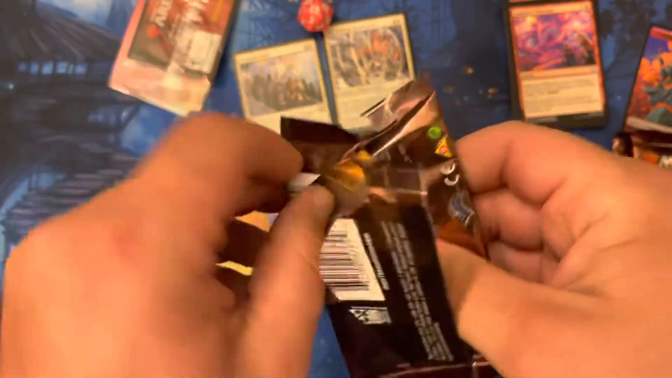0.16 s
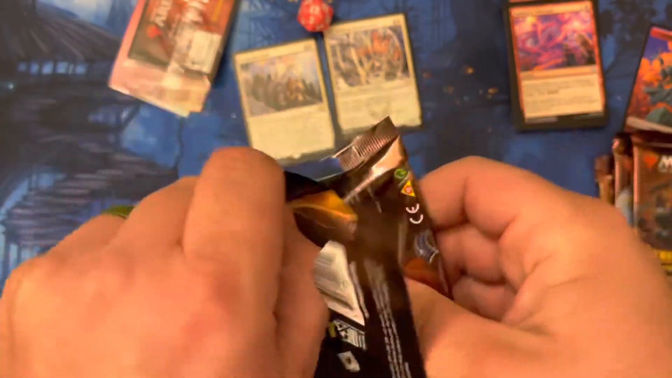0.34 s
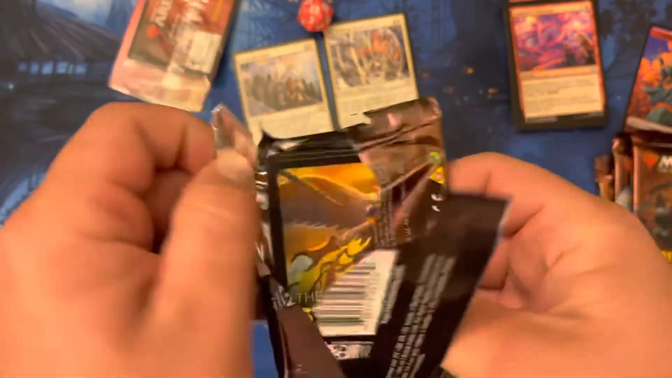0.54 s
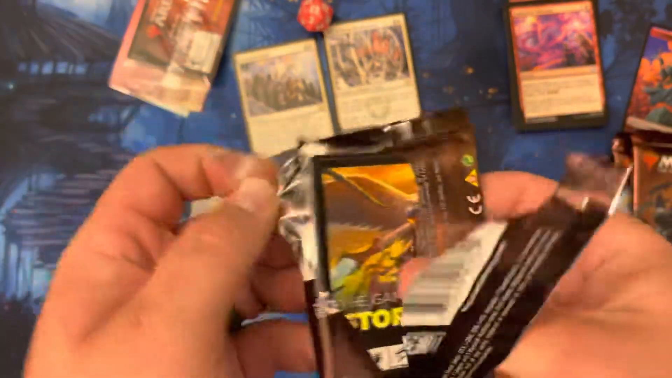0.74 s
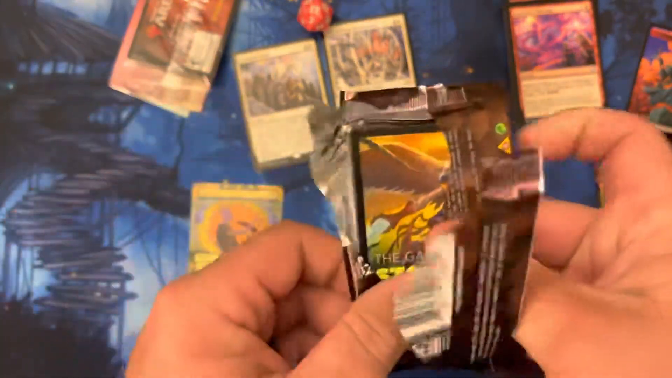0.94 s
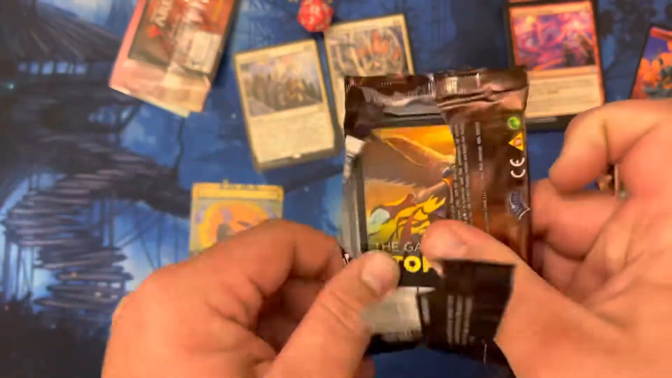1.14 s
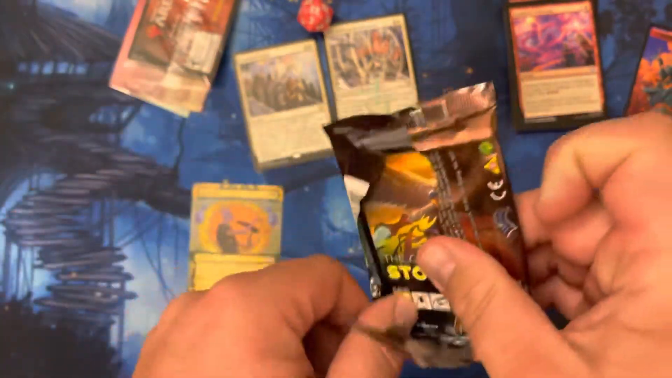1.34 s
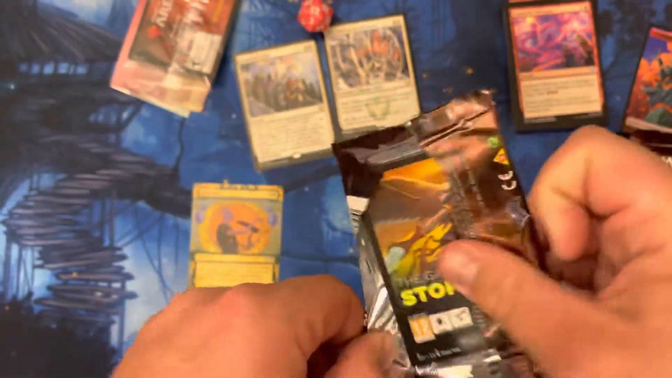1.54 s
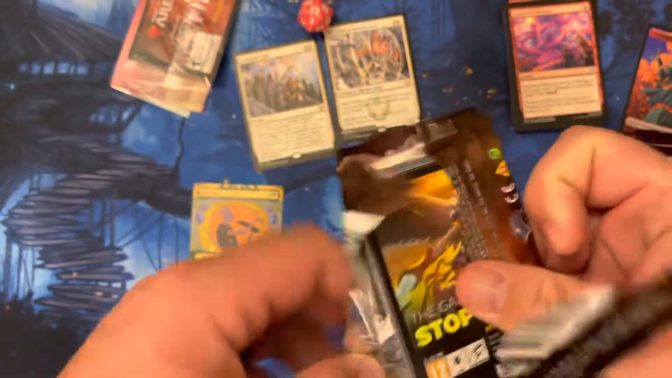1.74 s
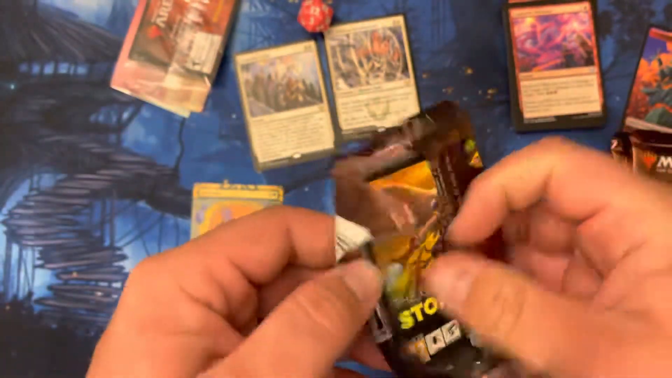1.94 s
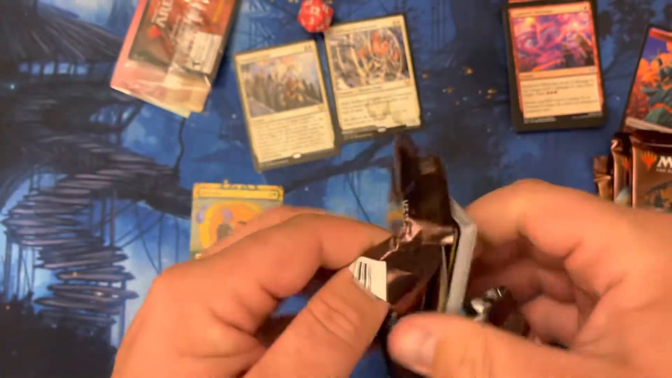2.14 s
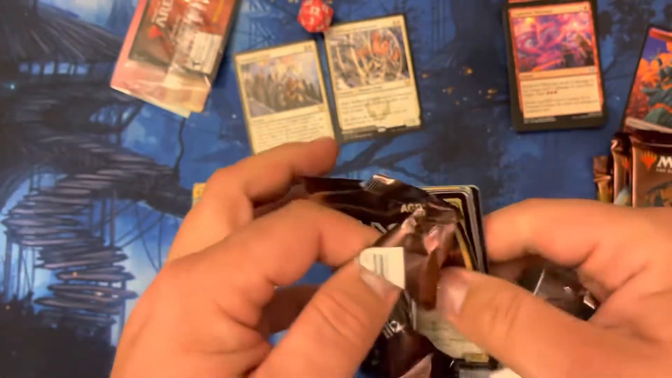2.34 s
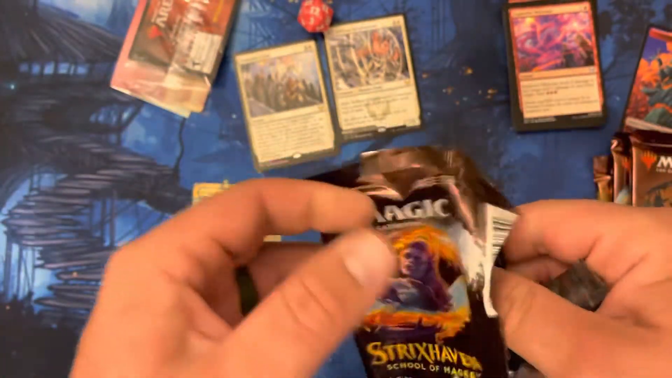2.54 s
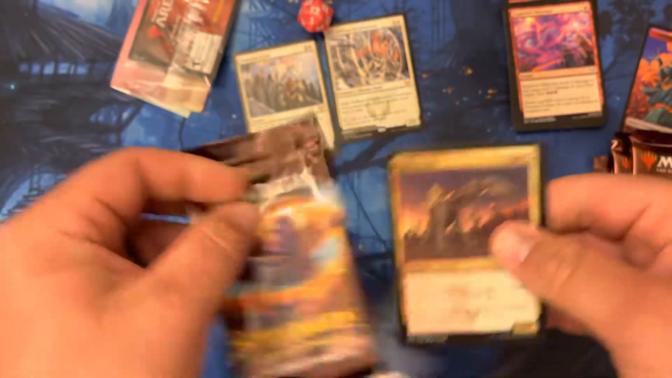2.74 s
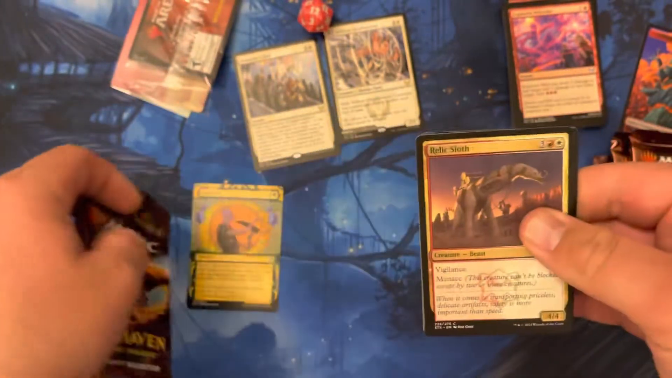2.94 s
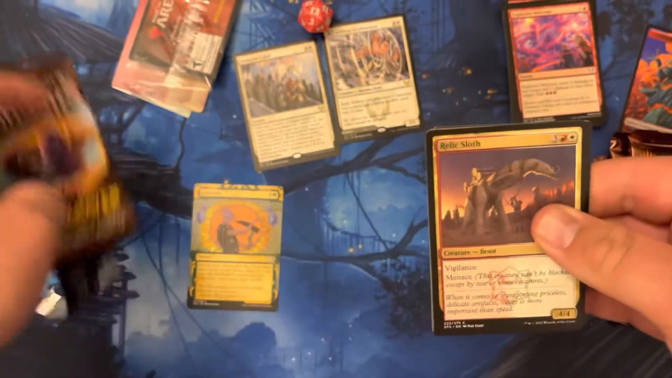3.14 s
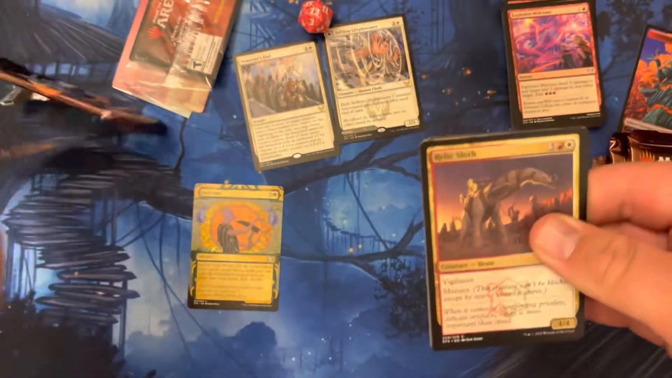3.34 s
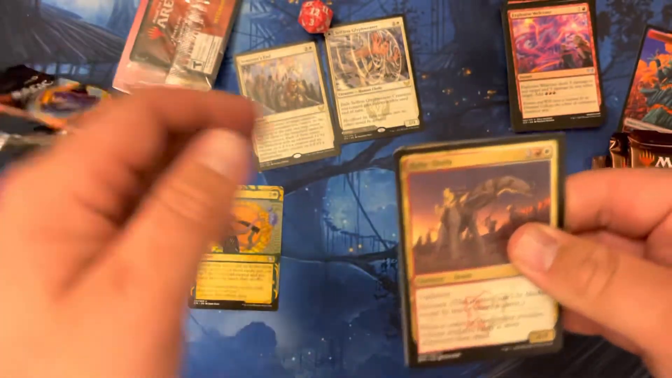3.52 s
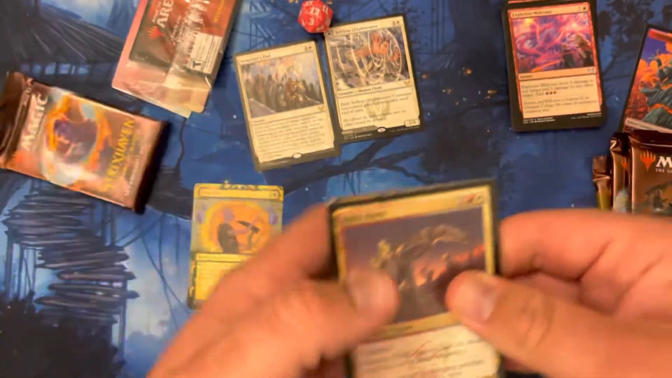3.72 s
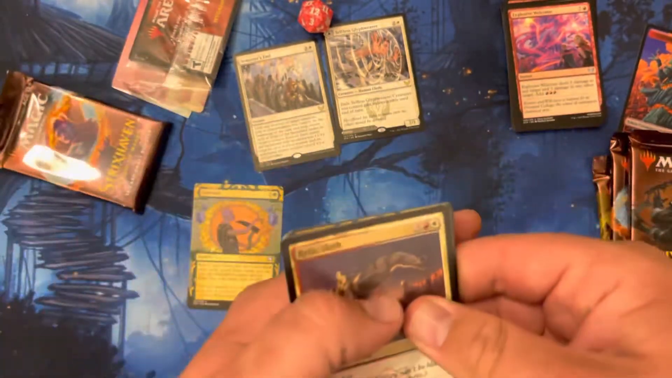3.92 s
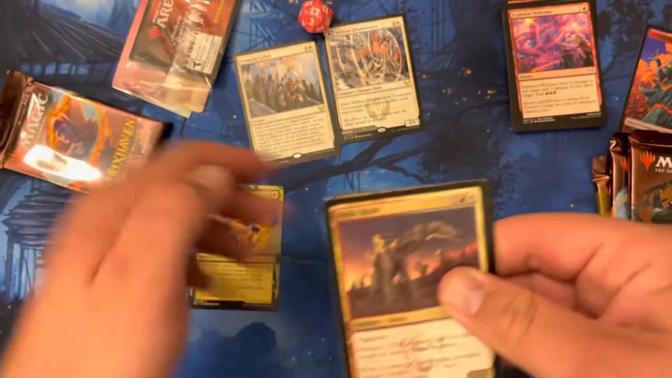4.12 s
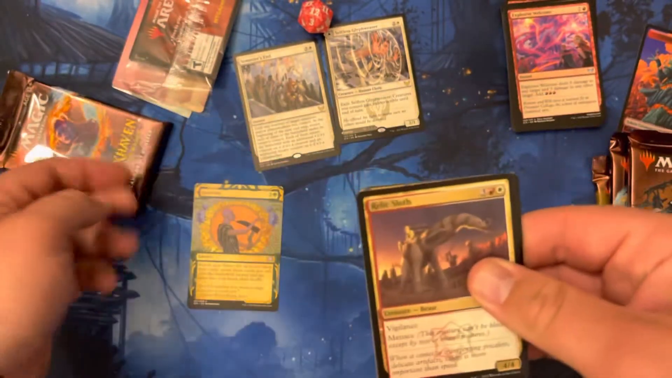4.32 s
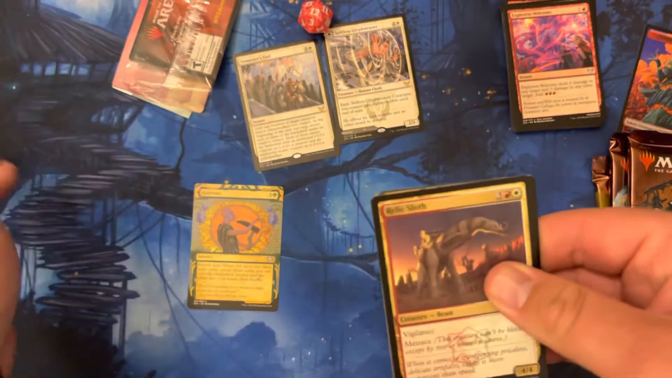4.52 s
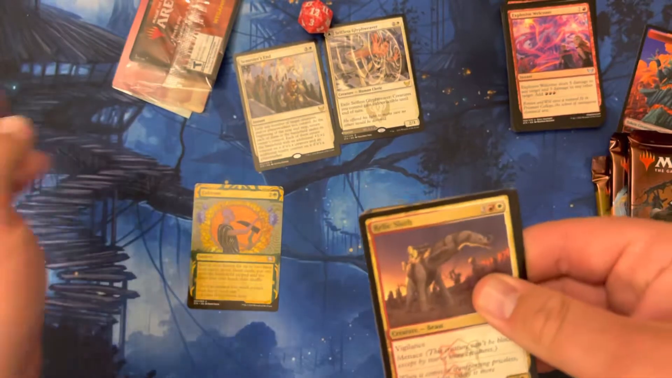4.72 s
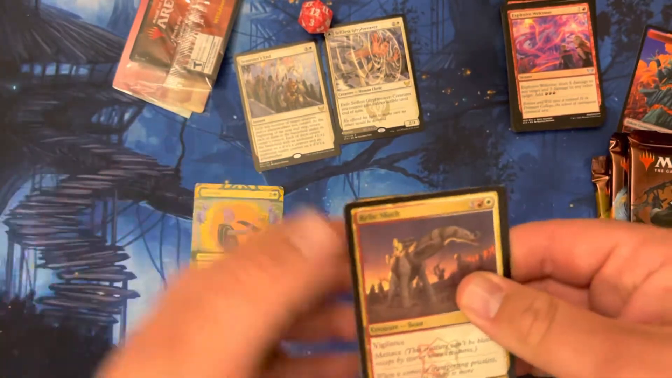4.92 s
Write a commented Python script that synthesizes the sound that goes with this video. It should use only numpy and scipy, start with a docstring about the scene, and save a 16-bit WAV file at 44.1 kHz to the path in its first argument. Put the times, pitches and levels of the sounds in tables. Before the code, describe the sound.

A foil card pack crackles and rips sharply in close fingers for nearly three seconds, then near silence with a brief wrapper scrape.

```python
"""On a mat in a quiet room, close under a phone, fingers crumple and tear a foil card pack; later the wrapper scrapes.
Buckling creases snap as noise bursts a few ms long; panels low and high pop as short damped sines.
Gated noise grains make rustle, rips, scrape and the soft rub of cards; jittered pulses make a creak.
Soft blows are short falling chirps with a shake of the table; hand rumble and faint air noise lie beneath.
Two microphone ports hear it with unequal phase and level, and with short reflections."""
import sys
import numpy as np
from scipy import signal
from scipy.fft import rfft, irfft
from scipy.io import wavfile
from scipy.ndimage import uniform_filter1d, map_coordinates

SR = 44100
rng = np.random.default_rng(int(sys.argv[2]) if len(sys.argv) > 2 else 0)


def int16_out(signal):
    """Quantize to a 16-bit WAV file."""
    q = np.round(np.clip(np.atleast_2d(signal).T, -1, 1) * 32767)
    wavfile.write(sys.argv[1], SR, q.astype(np.int16))


N = 223713

# Creases buckling: t/s, panel reference level/dB, panel f/Hz, pack body re panel/dB, treble re panel/dB
CREASE_SNAPS = [(0.0433, -22.5, 2570, -45, -20), (0.063, -16, 3820, -21.5, -17),
                (0.0952, -15.5, 2120, -20, -5), (0.104, -30, 2000, -21, -29),
                (0.1522, -24, 2090, -11.5, -14), (0.183, -39, 3000, -31, -6),
                (0.2027, -32, 2480, -46, -7.5), (0.2821, -20.5, 2520, -28.5, -37),
                (0.2986, -32.5, 3683, -22, 2), (0.316, -37, 2200, -16.5, -5.5),
                (0.3738, -30, 2170, -39, -40), (0.392, -29, 3170, -13.5, -14.5),
                (0.4058, -7, 2850, -26, -5.5), (0.4388, -6, 2890, -19, -1.5),
                (0.4417, -11, 2200, -9.5, -8.5), (0.45, -21, 5660, -12, 5.5),
                (0.4607, -9.5, 3220, -16.5, -16.5), (0.4705, -18.5, 6280, -22.5, 2),
                (0.4912, -20, 3135, -36.5, -9), (0.5046, -25, 6296, -18, -1.5),
                (0.5679, -16, 2150, -8.5, -2.5), (0.596, -18, 6300, -37, -1.5),
                (0.6354, -22.5, 2610, -18, -8), (0.6817, -15.5, 3370, -23, -8.5),
                (0.6871, -33.5, 2090, 8, -21), (0.6984, -22, 2080, -22, -25),
                (0.7198, -25.5, 5530, -39, -0.5), (0.7318, -12.5, 2900, -33, -9),
                (0.7419, -12.5, 6400, -20.5, -21), (0.8519, -19, 2830, -36, -16.5),
                (0.9152, -14.5, 4010, -40, -6.5), (0.9405, -23, 3920, -14, -14.5),
                (0.9495, -28, 2130, -29, -18.5), (0.968, -18.5, 2160, -6.5, -25.5),
                (0.9902, -12.5, 5840, -10.5, -5), (1.0423, -15, 2420, -8.5, -2),
                (1.0804, -17.5, 1750, -19.5, -32), (1.123, -25, 2688, -18, -15),
                (1.1319, -10.5, 3420, -49, -14), (1.2457, -16.5, 3580, -34, -21),
                (1.2516, -25, 2160, -19, -9), (1.2608, -19, 1740, -16, -17), (1.266, -24, 2800, -40, -11),
                (1.2744, -27.5, 3000, -28, -7.5), (1.279, -13, 2860, -17, 2),
                (1.3091, -16, 5776, -13.5, 0.5), (1.325, -29, 3000, -22, -2),
                (1.3303, -21.5, 2210, -13.5, -30), (1.3649, -23, 2400, -15.5, -10),
                (1.3831, -13, 6300, -37.5, -11), (1.4473, -16, 2597, -13, -3),
                (1.4494, -18.5, 3210, -16.5, -0.5), (1.4541, -9.5, 2970, -24, -1),
                (1.4648, -7.5, 1740, -20.5, -30), (1.491, -9, 2410, -16.5, -11),
                (1.505, -16, 2920, -5, -6.5), (1.5086, -7.5, 1800, -22, -6),
                (1.5185, -14.5, 2600, -21, -7.5), (1.5389, -11.5, 2880, -14.5, -10.5),
                (1.545, -18, 1704, -16, -3.5), (1.5551, -16, 2460, -23, 0),
                (1.5665, -27.5, 1800, -11.5, -13), (1.582, -20.5, 2540, -21.5, -7),
                (1.6112, -43, 5800, -17.5, -8.5), (1.6292, -11, 3200, -13.5, -2.5),
                (1.6352, -10.5, 2480, -24.5, -9), (1.6457, -17, 2416, -16.5, -4),
                (1.662, -25, 1700, -6.5, -15.5), (1.667, -18, 2520, -23.5, -28),
                (1.6991, -17, 3025, -18.5, -14), (1.7117, -20.5, 2138, -8.5, -8.5),
                (1.7309, -17.5, 2820, -5, -5.5), (1.7393, -17.5, 5810, -14.5, 1),
                (1.7524, -12.5, 5980, -15, 3.5), (1.7778, -13.5, 2440, -7.5, -4.5),
                (1.7973, -27, 2830, -37, 3.5), (1.8208, -22.5, 2140, -16, -34),
                (1.844, -19.5, 6040, -30.5, -3.5), (1.9028, -10, 6440, -31, -14),
                (1.9138, -20.5, 4140, -11.5, -2), (1.9264, -12, 1739, -16, 3),
                (1.942, -18, 2717, -7.5, -10), (1.9663, -14, 5857, -20, 1), (1.9957, -20, 3640, -17, -2),
                (2.006, -27, 2565, -5, -14), (2.013, -13, 6160, -23.5, -0.5),
                (2.0335, -7.5, 3700, -35, -13.5), (2.0683, -9, 2930, -17, -1), (2.089, -29, 3000, -9, -6.5),
                (2.1066, -32, 2200, -19.5, -9), (2.1192, -18, 5800, -22.5, -0.5),
                (2.168, -18, 1730, -24, -8), (2.1822, -6.5, 3920, -44, -8.5),
                (2.1947, -25, 2938, -16.5, -5), (2.2094, -9, 2680, -16, -1),
                (2.215, -11, 2790, -26.5, -22.5), (2.2528, -26, 5820, -23, -1.5),
                (2.2851, -23, 5966, -20, 2.5), (2.3088, -15.5, 3400, -34, -12.5),
                (2.32, -27, 5760, -12, -3.5), (2.3546, -36, 3320, -16.5, 8.5),
                (2.3835, -5.5, 2490, -25.5, -9.5), (2.3851, -2, 3900, -20, -5),
                (2.4208, -7, 3310, -18, -21), (2.4215, -13.5, 3500, -13, -6),
                (2.4482, -17.5, 3500, -20, -3.5), (2.4673, -6.5, 3750, -28, -8.5),
                (2.5279, -15.5, 5940, -44, 3.5), (2.5408, -20, 6040, -29.5, -13),
                (2.6089, -14.5, 1700, -10, -17.5), (2.6187, -18.5, 2438, -22, -14.5),
                (2.6465, -3.5, 3034, -24.5, -20), (2.6577, -16, 3550, -19, -15),
                (2.6773, -4, 5900, -31.5, -13.5), (2.7202, -24.5, 2500, -12.5, -10),
                (2.7467, -21, 1750, -11.5, -6.5), (2.769, -26, 2830, -32.5, -16),
                (2.802, -33, 2500, -27, -9), (2.8543, -15, 5340, -23.5, -3.5), (2.8898, -23, 5540, -17, -6),
                (2.9425, -32, 3980, -17, -4), (3.012, -49, 2200, -4, -16), (3.036, -37, 5800, -27, -21.5),
                (3.058, -22.5, 6260, -36, -23), (3.0674, -24.5, 1820, -17, -16),
                (3.083, -29, 1700, -15, -16), (3.1172, -33.5, 5880, -12, -11), (3.141, -46, 2500, -22, -30),
                (3.1588, -24, 5850, -20, -0.5), (3.2683, -29.5, 2450, -15.5, -15.5),
                (3.2951, -45, 2660, 1, -37), (3.319, -48, 6480, -13, -4), (3.3653, -46.5, 1930, -6, -9),
                (3.3831, -45.5, 2100, -10, -29), (3.4103, -51.5, 6410, -16.5, 1),
                (3.6357, -32.5, 2150, -11.5, -37.5), (3.8218, -44.5, 4000, -32, -9.5),
                (4.344, -21.5, 5600, -38, -3), (4.4203, -23, 5710, -48, 3.5), (4.439, -30, 6300, -36, -3),
                (4.474, -43, 2500, -27, -12), (4.5818, -40, 4220, -26, -17), (4.7217, -37, 3600, -32, -25),
                (4.73, -31.5, 5790, -22.5, -22)]
# Bands of a snap, low to high: lower f/Hz, upper f/Hz, level/dB
CREASE_BANDS = [(145, 380, -18.5), (420, 1840, 7.5), (1410, 3900, -14.5), (4430, 7360, -1.5),
                (7720, 8250, -3.5), (9640, 12565, 10.5), (12500, 14000, 0)]
# Modes of the stack of cards in its sleeve: f/Hz, width/Hz, level/dB
PACK_MODES = [(490, 310, -7.5), (674, 33, -4), (940, 100, -9), (1380, 250, 1.5), (1680, 170, -0.5),
              (2120, 42, 6.5)]
# Panels popping, low and high: t/s, level/dB, f/Hz
PANEL_POPS = [(1.039, -34, 1300), (1.0795, -36, 520), (1.6343, -16, 870), (1.6371, -18, 443),
              (1.663, -35, 597), (1.677, -32, 820), (2.115, -20, 2880), (2.853, -36, 600),
              (2.891, -33.5, 684), (3.267, -36, 2450), (3.297, -31, 2440), (3.6374, -31, 3670),
              (4.349, -35, 570), (4.724, -34.5, 4390)]
# Radiation of the foil sheet: f/Hz, relative spectral level/dB
FOIL_SPECTRUM = [(300, -9.5), (1000, -7.5), (2500, -3), (5000, -1), (8000, -3.5), (10500, -1.5),
                 (12500, -1), (13800, -17), (16000, -24)]
# Rips and swishes: start t/s, length/s, mid-rip level/dB, fall over the rip/dB, pack body re level/dB
RIP_EVENTS = [(0.4345, 0.054, -26, 14, -27), (0.732, 0.0037, -24, -1, -6.5), (0.925, 0.034, -45.5, 2, 1),
              (1.037, 0.014, -26, 3, 0), (1.054, 0.04, -35, 9, 4.5), (1.211, 0.018, -45.5, 9, 7),
              (1.27, 0.036, -42, 4, 8.5), (1.499, 0.022, -19.5, -0.5, -7.5), (1.549, 0.01, -27.5, 0, -4.5),
              (1.62, 0.012, -30, -9, 5.5), (1.728, 0.033, -41, 9, -4), (1.899, 0.015, -26, 0, -0.5),
              (2.032, 0.022, -31, 8, -6), (2.442, 0.031, -20, -2, -15.5), (2.496, 0.029, -31, 2, -13),
              (2.638, 0.041, -26, 12, -10.5), (2.711, 0.012, -44.5, -6, 12.5),
              (2.78, 0.035, -41.5, -0.5, -4), (3.28, 0.048, -53, 3, -7.5), (3.64, 0.072, -62.5, 28, -8),
              (3.961, 0.081, -56, 3, -54), (4.011, 0.11, -73.5, 10.5, -7), (4.245, 0.077, -69.5, 12, -21.5),
              (4.58, 0.033, -62.5, 17, -8), (4.727, 0.12, -62.5, 22, -8), (5.025, 0.072, -51.5, -23, -70)]
# How firmly the fingers work the foil: t/s, rustle level/dB
RUSTLE_COURSE = [(0.0, -46), (0.39, -53.5), (0.69, -49.5), (0.82, -47), (0.89, -66), (0.93, -47),
                 (1.2, -51.5), (1.31, -65), (1.44, -42), (2.19, -41.5), (2.56, -39), (2.73, -41.5),
                 (2.84, -53), (3.108, -52), (3.191, -60.5), (3.35, -63.5), (3.588, -69.5), (3.72, -70),
                 (3.77, -93.5), (3.85, -83), (3.93, -95), (3.98, -74), (4.19, -79), (4.31, -65),
                 (4.399, -64.5), (5.07, -71.5)]
# Crinkling panels of several sizes: f/Hz, level/dB
CRINKLE_PANELS = [(900, -0.5), (1700, 1), (3000, 4.5), (5500, -7), (9500, -20)]
# Wrapper dragged off the mat: t/s, level/dB, pack body re level/dB, middle band before doubling/dB
SCRAPE_COURSE = [(4.333, -60, -8.5, 0), (4.338, -31.5, -5.5, 6), (4.349, -19, -23, -4.5),
                 (4.354, -27, -5, -5), (4.371, -29, -20.5, -6), (4.399, -20, -28, -19),
                 (4.422, -16, -45, -39), (4.427, -23.5, -40, -11), (4.441, -19, -54, -29),
                 (4.45, -38, -23, -9), (4.56, -66, -25, -20.5)]
# Hands and pack bumping the mat: t/s, level/dB, f/Hz that sets when the chirp peaks
MAT_BLOWS = [(0.408, -40.5, 260), (0.44, -33.5, 242), (0.568, -44, 250), (0.686, -37.5, 260),
             (0.743, -45, 161), (0.835, -45, 250), (1.045, -44, 202), (1.135, -51.5, 171),
             (1.281, -51, 210), (1.631, -35, 230), (1.676, -36.5, 260), (1.778, -35.5, 199),
             (1.807, -43.5, 243), (1.909, -39.5, 110), (2.006, -37.5, 172), (2.068, -51.5, 140),
             (2.208, -32.5, 223), (2.332, -62, 120), (2.383, -46, 150), (2.421, -34.5, 210),
             (2.468, -33.5, 123), (2.536, -52.5, 77), (2.651, -32, 145), (2.712, -36.5, 103),
             (2.757, -50.5, 120), (3.085, -49, 180), (3.268, -43.5, 436), (3.297, -47, 400),
             (3.367, -48.5, 397), (4.246, -55, 359), (4.275, -44.5, 100), (4.343, -30, 420),
             (4.357, -40, 130), (4.423, -47.5, 376), (4.573, -44.5, 403), (4.724, -52, 142.5),
             (4.785, -53.5, 110.8)]
# Fingers sliding over the cards: start t/s, length/s, level/dB, f/Hz
CARD_RUBS = [(3.957, 0.21, -75.5, 2072), (4.234, 0.058, -71.5, 1710), (4.471, 0.16, -64, 4090),
             (4.748, 0.38, -79, 2064)]
# Hands resting and shifting on the mat: t/s, drive level/dB
HAND_WEIGHT = [(0.0, -58), (0.15, -76), (0.35, -64), (0.63, -54), (1.35, -69.5), (1.71, -58), (2.74, -50.5),
               (3.83, -75), (4.29, -82.5), (4.42, -57), (5.07, -81.5)]
# Room rumble and hiss: f/Hz, relative spectral level/dB
AIR_SPECTRUM = [(20, -17.5), (40, 3), (80, 3), (160, -10.5), (250, -5), (400, -24), (600, -22.5),
                (1500, -30.5), (5000, -26), (8000, -22), (11000, -28), (12300, -29.5), (16000, -29.5)]
# Phase between the ports: f/Hz, lead of the left/rad
PORT_LEAD = [(0, 0), (600, -.2), (1030, -.5), (1400, 0), (2200, .1), (4220, .8), (4600, 1.8), (4850, 3.14),
             (5250, 5.0), (5680, 6.1), (6720, 6.9), (7840, 8.4), (8400, 9.2), (9200, 9.5), (11900, 12.2),
             (13500, 12.9), (14800, 15.2), (16200, 15.6)]
# Level between the ports: f/Hz, left minus right/dB
PORT_LEVELS = [(60, .5), (200, 1), (380, 3), (700, 3), (1290, 0), (2380, -.5), (4400, -1), (8120, 0)]
# Microphone response: f/Hz, level/dB
MIC_RESPONSE = [(11000, -1.5), (12000, -12), (13300, -16.5), (15700, -24), (16500, -42)]

# Snaps: the foil creeps, buckles at once, then the crease runs on well below the first peak
CREEP_S, CREEP_DB, FRONT = .0008, -20, 1.07  # FRONT: size of the first buckle against the slips
BUCKLE_T60_S, BUCKLE_CYCLES = .0034, 4  # decay time, plus this many cycles of the band's lower edge
RUN_T60_S, RUN_DB = 0.014, -17
PANEL_SPAN, PANEL_DB = 1.226, -2.5  # the panel rings from f / span to f * span
UPPER_FOLLOWS_TREBLE = 0.3  # dB per dB; the 4.7-8 kHz region lies between panel and treble

POP_CYCLES = 2.325  # sets the length of a pop
MID_DB, MID_FOLLOWS_BODY = 5.5, 0.31  # in a rip 1.4-4 kHz rises with the body, dB per dB
RUSTLE_BODY_DB, GRIP_ENDS_S = -8.5, 3.1  # the wrapper is let go at GRIP_ENDS_S
SCRAPE_RING_HZ, SCRAPE_RING_DB = 3700, -8.5  # level before doubling
CREAK_S, CREAK_LENGTH_S, CREAK_RATE_HZ = 1.044, .04, 223
CREAK_DB, CREAK_JITTER = -30.5, .03  # jitter as a share of the slip period
DELAY_CYCLES, CHIRP_START_S = 1.4, .002  # the chirp of a blow at f Hz peaks cycles / f late
TABLE_HZ, TABLE_T60_S, TABLE_DB = 260, 0.11, -7  # the table top rings on
SHAKE_T60_S, SHAKE_DB, SHAKE_SPLIT_HZ = 0.04, -6, 110  # low blows feed the deep band
WANDER_DB, WANDER_S, WANDER_LOW = 1.5, 8e-6, .25  # level swing, time swing, swinging share of the lows
NEAR_T60_S, NEAR_DB = .008, -16  # hands, cards and mat right by the ports
ROOM_T60_S, ROOM_DB = 0.087, -16
AIR_DB = -69.5
TOP_HZ = 16600


def undb(db):
    """Amplitude ratio of a level: 20 dB per factor of ten."""
    return 10 ** (np.asarray(db) / 20)


def along(table, scale=np.log):
    """Frequency response: interpolate a table at every bin of an N-point spectrum."""
    hz, value = np.transpose(table)
    bins_hz = np.fft.rfftfreq(N, 1 / SR)
    return np.interp(scale(bins_hz + 1), scale(hz + 1), value)


def coloured(x, table):
    """Linear filtering by a magnitude spectrum, normalised to rms 1."""
    y = irfft(rfft(x) * undb(along(table)), N)
    return y / np.sqrt(np.mean(y ** 2))


def band(x, lo_hz, hi_hz, order=2):
    """Band limitation: a band-pass along the last axis."""
    sos = signal.butter(order, [lo_hz, hi_hz], "bandpass", fs=SR, output="sos")
    return signal.sosfilt(sos, x)


def add(out, times, sounds):
    """Superposition: sum short sounds at their onset times."""
    for t, sound in zip(times, sounds):
        i = int(t * SR)
        out[i:i + len(sound)] += sound[:N - i]


def grains(rate, spread_db, t60):
    """Shot noise: random ticks of very uneven but bounded size gate noise with short decays; rms 1."""
    size_db = np.minimum(spread_db * rng.exponential(size=N), 18)
    ticks = (rng.random(N) < rate / SR) * undb(size_db)
    envelope = signal.lfilter([1], [1, -undb(-60 / (t60 * SR))], ticks)
    x = envelope * rng.standard_normal(N)
    return x / np.sqrt(np.mean(x ** 2))


def snaps():
    """Buckling instability: slow creep, a sharp front, then smaller slips; low bands rise later."""
    s, panel_db, panel_hz, body_db, treble_db = np.transpose(CREASE_SNAPS)
    t = np.arange(2048) / SR
    after = np.maximum(t - CREEP_S, 0)
    first_buckle = t == t[int(CREEP_S * SR)]
    noise = rng.standard_normal((len(s), len(CREASE_BANDS) + 2, len(t)))
    slips = undb(19.0 * uniform_filter1d(noise[:, -1], size=16))
    out = np.zeros(N)

    def excitation(which, lo):
        creep = undb(CREEP_DB) * np.minimum(t / CREEP_S, 1)
        rise = creep + 1 - np.exp(-(after * lo / 0.5) ** 2)
        buckle = undb(-60 * after / (BUCKLE_T60_S + BUCKLE_CYCLES / lo))
        run = undb(RUN_DB - 60 * after / RUN_T60_S)
        front = FRONT * np.sqrt(SR / lo) * first_buckle
        return rise * (buckle + run) * slips * noise[:, which] + front

    def place(burst, db):
        peak = np.abs(burst).max(axis=1, keepdims=True)
        add(out, s, burst / peak * undb(panel_db + db)[:, None])

    upper_db = UPPER_FOLLOWS_TREBLE * treble_db
    shares_db = (body_db, body_db, 0, upper_db, treble_db, treble_db, treble_db)
    for k, (lo, hi, db) in enumerate(CREASE_BANDS):
        place(band(pack(excitation(k, lo)), lo, hi, order=3), shares_db[k] + db)
    # the flat panel beside each crease has its own size, so its own pitch
    panels = [band(row, hz / PANEL_SPAN, hz * PANEL_SPAN)
              for row, hz in zip(excitation(-2, 2000), panel_hz)]
    place(np.array(panels), PANEL_DB)
    return out


def pack(x):
    """Modal resonance: the stack of cards adds its own few pitches to the excitation."""
    modes = 0
    for hz, width, db in PACK_MODES:
        modes = modes + undb(db) * signal.lfilter(*signal.iirpeak(hz, hz / width, fs=SR), x)
    return x + modes


def pops():
    """Snap-through: a panel, low or high, flips over and sounds as a short damped sine at its own pitch."""
    s, db, hz = np.transpose(PANEL_POPS)[:, :, None]
    turns = hz * np.arange(1024) / SR
    k = turns / POP_CYCLES * 4
    out = np.zeros(N)
    add(out, s[:, 0], undb(db) * np.sin(2 * np.pi * turns) * k * np.exp(1 - k))
    return out


def foil(x, body_db, mid_db):
    """Radiation of a thin sheet: the lower shares follow how much of the pack moves."""
    x = coloured(x, FOIL_SPECTRUM)
    body = band(pack(x), 160, 1900)
    treble, mid = band(x, 5300, 22000), band(x, 1400, 4000)
    return treble + undb(mid_db) * mid + undb(body_db) * body / body.std()


def rips():
    """Stick-slip at thousands of slips a second, starting and stopping abruptly."""
    t = np.arange(N) / SR
    gain, body_db = np.zeros((2, N))
    for start, length, db, fade_db, low_db in RIP_EVENTS:
        on = (t >= start) & (t < start + length)
        gain[on] = undb(db - fade_db * ((t[on] - start) / length - .5))
        body_db[on] = low_db
    slips = grains(2800, 8, 0.007)
    smooth_gain = uniform_filter1d(gain, size=88)  # 2 ms
    return smooth_gain * foil(slips, body_db, MID_DB + MID_FOLLOWS_BODY * body_db)


def rustle(strain):
    """Crackling noise: countless small creases, high or low by panel size; strain left by snaps adds more."""
    t = np.arange(N) / SR
    level_db = np.interp(t, *np.transpose(RUSTLE_COURSE))
    bed = foil(grains(1200, 3.6, 0.0021), RUSTLE_BODY_DB, -1.1)
    crinkles = 0
    for hz, db in CRINKLE_PANELS:
        crinkles = crinkles + undb(db) * band(grains(85, 6.1, 0.022), hz / 1.32, hz * 1.23)
    # distinct crinkles only while the pack is gripped
    gripped = np.arange(N) < GRIP_ENDS_S * SR
    handled = np.clip((level_db + 68) / 10, 0, 1) * gripped
    return (undb(level_db) + strain) * (bed + handled * crinkles)


def settling(x, t60, db):
    """Relaxation: the rms of x held with a slow release, as the sheet still has to relax."""
    keep = undb(-120 / (t60 * SR))  # acts on power
    power = signal.lfilter([1 - keep], [1, -keep], x ** 2)
    return undb(db) * np.sqrt(power)


def scrape():
    """Dry friction: the empty wrapper slips over the weave of the mat; the lows drop out as it lifts."""
    t = np.arange(N) / SR
    s, level_db, body_db, mid_db = np.transpose(SCRAPE_COURSE)
    slips = grains(4700, 7.3, 0.012)
    mid = undb(np.interp(t, s, mid_db)) * 2 * band(slips, 1540, 3900, order=3)
    rub = foil(slips, np.interp(t, s, body_db), -np.inf) + mid  # the foil's own middle band is silent
    ring = undb(SCRAPE_RING_DB) * 2 * band(slips, SCRAPE_RING_HZ / 0.98, SCRAPE_RING_HZ * 1.1)
    gain = undb(np.interp(t, s, level_db, left=-np.inf, right=-np.inf))
    return gain * (rub + ring)


def creak():
    """Regular stick-slip: the seam opens in nearly even slips that ring the pack."""
    slips = np.arange(int(CREAK_LENGTH_S * CREAK_RATE_HZ) + 1)
    chance = rng.standard_normal((len(slips), 2))
    times = CREAK_S + (slips + CREAK_JITTER * chance[:, 0]) / CREAK_RATE_HZ
    pulses = np.zeros(N)
    pulses[(times * SR).astype(int)] = undb(1.3 * chance[:, 1])
    ring = band(pulses, 520, 900)
    return undb(CREAK_DB) * ring / np.sqrt(np.sum(ring ** 2) / (CREAK_LENGTH_S * SR))


def thuds():
    """Group delay: soft blows heard as short falling chirps, the lows delayed by the phone's low-cut filter."""
    s, db, hz = np.transpose(MAT_BLOWS)[:, :, None]
    t = np.arange(6144) / SR
    late = t * hz / DELAY_CYCLES  # 1 at the peak of the envelope
    falling = np.sin(2 * np.pi * DELAY_CYCLES * np.log1p(t / CHIRP_START_S))
    chirp = falling * (late * np.exp(1 - late)) ** 1.4
    table = np.sin(2 * np.pi * TABLE_HZ * t) * undb(TABLE_DB - 60 * t / TABLE_T60_S)
    ring = table * np.minimum(late, 1) * (hz / TABLE_HZ) ** 2
    out = np.zeros(N)
    add(out, s[:, 0], band(chirp + ring, 52, 2000) * undb(db))
    return out


def rubs():
    """Sliding friction: narrow, grainy hiss that swells fast and dies away."""
    t, out = np.arange(N) / SR, 0
    for start, length, db, hz in CARD_RUBS:
        done = np.clip((t - start) / length, 0, 1)
        swell = np.minimum(done * 4, 1) * np.sqrt(1 - done)
        hiss = band(grains(1300, 2.74, 0.0087), hz / 1.2, hz * 1.205)
        out = out + undb(db) * hiss / hiss.std() * swell
    return out


def wander(x):
    """Level and time differences: the hands move about under the ports, and the lows swing most."""
    knots = np.arange(0, N + 1024, 1024)
    side, low = (np.interp(np.arange(N), knots, rng.standard_normal(N // 1024 + 2)) for _ in range(2))
    way = np.array([side, -side]) / 2
    delayed = [map_coordinates(x, [np.arange(N) + WANDER_S * SR * w], mode="mirror") for w in way]
    moved = undb(WANDER_DB * way) * np.array(delayed)
    return moved + WANDER_LOW * low * band(x, 160, 900) * np.array([[1], [-1]])


def tail(x, t60, db, onset):
    """Diffuse reflection: exponentially decaying noise, independent at each port."""
    t = np.arange(SR // 3) / SR
    echo = rng.standard_normal((2, len(t))) * undb(-60 * t / t60) * np.minimum(t / onset, 1)
    echo /= np.sqrt(np.sum(echo ** 2, axis=1, keepdims=True))
    return undb(db) * signal.fftconvolve(x[None], echo)[:, :N]


def rumble():
    """Structure-borne sound: the weight of the hands on the table, and a decaying shake after every blow."""
    t = np.arange(N) / SR
    coarse_t = t[::64]
    hands = undb(np.interp(t, *np.transpose(HAND_WEIGHT)))
    s, db, hz = np.transpose(MAT_BLOWS)[:, :, None]
    decay = undb(db + SHAKE_DB - 60 * np.maximum(coarse_t - s, 0) / SHAKE_T60_S)
    shake = decay * np.clip((coarse_t - s) / 0.0042, 0, 1)
    deep_share = 1 / (1 + (hz / SHAKE_SPLIT_HZ) ** 2)
    deep_gain = np.interp(t, coarse_t, (shake * deep_share).sum(axis=0))
    low_gain = np.interp(t, coarse_t, (shake * (1 - deep_share)).sum(axis=0))
    deep = band(grains(260, 1.5, 0.12), 61, 100)
    low = band(grains(230, 1.3, 0.041), 77, 290, order=3)
    deep_part = (undb(-13.5) * hands + undb(-1) * deep_gain) * deep / deep.std()
    low_part = (undb(-2.5) * hands + undb(-2.0) * low_gain) * low / low.std()
    return deep_part + low_part


def air():
    """Partial coherence: wavering room rumble and hiss, a small part of it unrelated at the two ports."""
    mid, left, right = (coloured(rng.standard_normal(N), AIR_SPECTRUM) for _ in range(3))
    steps = np.repeat(rng.standard_normal(N // 4096 + 1), 4096)
    waver = uniform_filter1d(steps, size=4096)[:N]
    return undb(AIR_DB + 2.0 * waver) * (mid + 0.098 * np.array([left, right]))


def scene():
    """Superposition of direct sound, reflections and background at the two ports."""
    cracks = snaps()
    strain = settling(cracks, 0.032, -11.0)
    near = cracks + pops() + rips() + rustle(strain) + scrape() + creak() + rubs()
    echoes = tail(near, NEAR_T60_S, NEAR_DB, 0.000091) + tail(near, ROOM_T60_S, ROOM_DB, 0.0015)
    return wander(near + thuds()) + echoes + rumble() + air()


def record(dry):
    """Transduction: treble roll-off, phase and level differences of the ports, rounded peaks, a steep top limit."""
    # each port takes half of the difference
    turn = np.exp(.5j * along(PORT_LEAD, np.asarray)) * undb(along(PORT_LEVELS) / 2)
    ports = irfft(rfft(dry) * undb(along(MIC_RESPONSE)) * np.array([turn, 1 / turn]), N)
    ports = ports / (1 + (ports / .82) ** 4) ** .25
    return signal.sosfilt(signal.ellip(12, .2, 95, TOP_HZ, fs=SR, output="sos"), ports)


dry = scene()
out = record(dry)
int16_out(out)
```